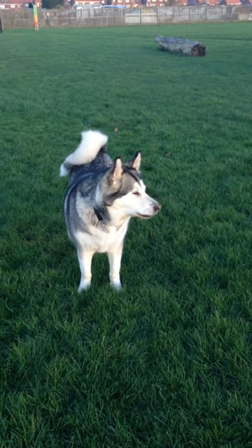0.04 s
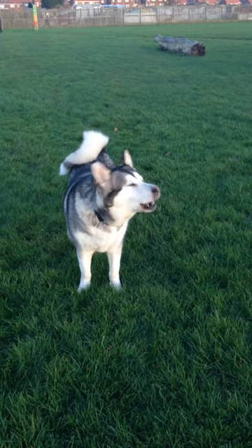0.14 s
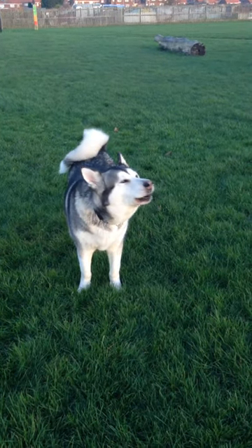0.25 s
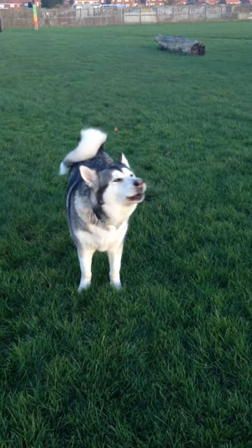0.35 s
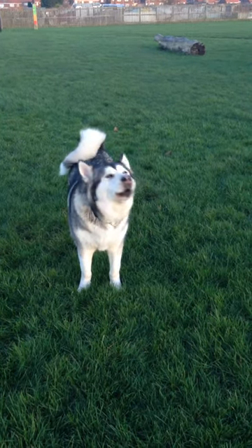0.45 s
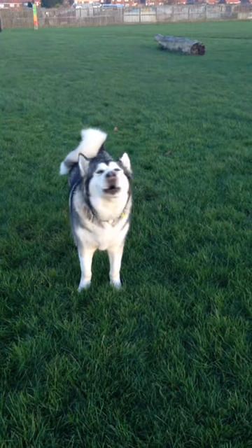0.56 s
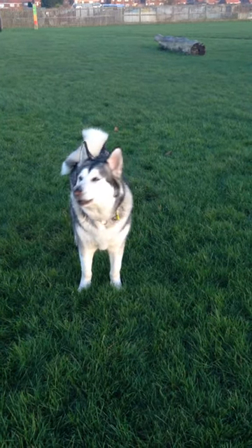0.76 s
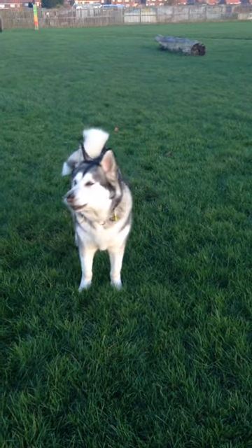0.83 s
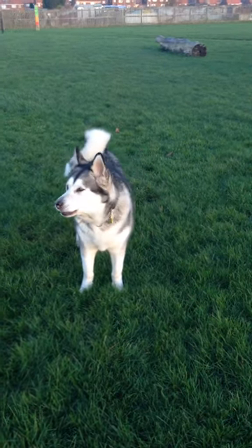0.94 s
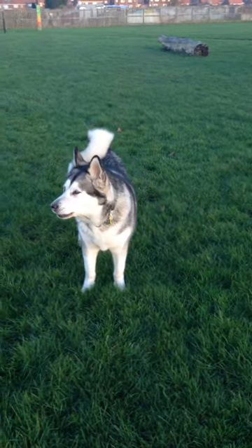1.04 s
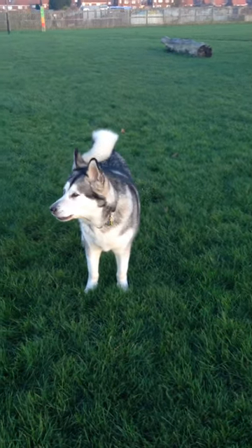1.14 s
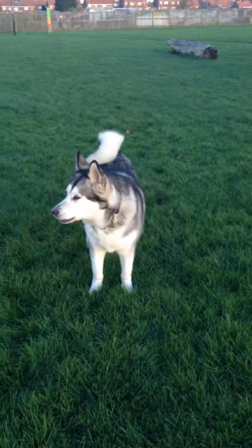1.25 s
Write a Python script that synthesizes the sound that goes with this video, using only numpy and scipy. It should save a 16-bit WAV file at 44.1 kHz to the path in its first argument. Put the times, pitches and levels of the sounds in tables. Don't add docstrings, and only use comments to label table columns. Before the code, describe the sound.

A dog howls once, starting with a loud bark-like burst, then a quieter, nearly pure held note that slides down and ends in a faint throaty creak; quiet open field, phone a few metres away.

```python
import sys
import numpy as np
from scipy import signal
from scipy.io import wavfile
from scipy.ndimage import uniform_filter1d, minimum_filter1d

SR = 44100
rng = np.random.default_rng(int(sys.argv[2]) if len(sys.argv) > 2 else 0)


def how_loud(loudness_db):
    steps = np.asarray(loudness_db, float) / 20
    return 10 ** steps


def file_out(sig):
    cols = np.atleast_2d(sig).T
    lim = np.clip(cols, -1, 1)
    pcm = np.round(lim * 32767).astype(np.int16)
    wavfile.write(sys.argv[1], SR, pcm)


N = 57330
TIME_S = np.arange(N) / SR

# f/Hz, level/dB per Hz
TRAFFIC_SPECTRUM = [(200, -5), (330, -18.5), (480, -3.5), (850, -3.5), (1600, -12.5), (2300, -23.5),
                    (3500, -26), (15300, -29)]
# f/Hz, level/dB per Hz
WIND_SPECTRUM = [(28, -26.5), (45, -1), (62, 10.5), (100, 3.5), (170, -7.5), (260, -22)]
TRAFFIC_DB, WIND_DB = -57, -53.5
# t/s, length/s, level over the steady wind/dB
GUSTS = [(.01, 0.014, -14), (0.132, 0.027, 5.5), (0.276, 0.019, 2.5), (0.405, 0.028, -2.5),
         (.51, 0.022, -6.5), (0.557, 0.025, 3), (.79, .03, -6.5), (0.922, 0.02, 4), (0.98, .02, -8.5),
         (1.048, 0.047, 2.5), (1.204, 0.026, -5), (1.268, 0.026, 5)]

# f/Hz, width/Hz, level/dB
PUFF_FORMANTS = [(400, 83, 6.5), (653, 140, 2.5), (900, 750, -14), (1360, 350, -33), (174, 150, -2.5)]
PUFF_S, PUFF_END_S, PUFF_FROM_DB, PUFF_TO_DB = .17, .188, -46, -44

# t/s, pitch f/Hz, fundamental level/dB, octave level/dB
VOICE_BARK = [
    (0.188, 270.2, -44.5, -33.5),
    (0.2, 307.7, -31, -26.5),
    (0.21, 337.5, -17.5, -29),
    (0.225, 378.3, -5.5, -21),
    (0.231, 389.4, -5, -15),
    (0.251, 387.9, -5, -16),
    (0.258, 368.6, -10.5, -23.5),
    (0.262, 356.7, -12, -48.5),
    (0.272, 333.7, -14.5, -23.5),
]
VOICE_SHOULDER = [(.282, 341.7, -15.5, -28.5), (.3, 342.8, -17, -33), (.314, 344.8, -20.5, -40.5),
                  (.322, 374.4, -21, -34), (.329, 403.7, -30, -37)]
VOICE_HELD = [(.342, 397.9, -30, -39), (.39, 395.5, -30, -42.5), (.47, 361, -26, -39.5),
              (.54, 366.4, -27.5, -40), (.6, 357.8, -29, -41.5), (.665, 335.8, -27.5, -43),
              (.7, 331.9, -28, -45.5), (.728, 336.3, -26.5, -39.5), (.76, 333.8, -31, -40)]
VOICE_SLIDE = [(0.775, 313.2, -40.5, -43.5), (0.817, 280.6, -43.5, -33.5), (0.877, 246.5, -50, -38),
               (0.919, 235, -57.5, -41.5), (0.943, 194, -58.5, -40.5), (0.949, 193, -63, -21)]
# t/s, resonance f/Hz, mouth level/dB, overtone level/dB, rasp level/dB
MOUTH_BARK = [(.185, 800, -47, -75, -61), (.2, 900, -36, -49, -55), (.218, 1080, -23, -46, -42.5),
              (.235, 1200, -41, -49, -40), (.25, 1200, -51.5, -59.5, -45.5), (.263, 1080, -34.5, -44, -54),
              (.29, 1000, -53, -43, -54), (.312, 1100, -67.5, -54.5, -64.5), (.33, 1180, -73, -62, -77)]
MOUTH_HELD = [(.4, 1140, -90.5, -82.5, -87), (.5, 1080, -84.5, -81, -76), (.64, 1059, -75.5, -79, -95.5),
              (.72, 994, -73, -74.5, -71), (.77, 951, -76, -83, -85)]
MOUTH_SLIDE = [(.8, 870, -52.5, -88.5, -90), (.825, 836, -50.5, -83, -73), (.84, 825, -55.5, -84, -87),
               (.865, 765, -53, -90, -87), (.95, 674.4, -83, -97, -95)]
MOUTH_WIDTH_HZ, MOUTH_SHUTS_S = 350, .32
# f/Hz, width/Hz, level/dB
THROAT_FORMANTS = [(1400, 350, -2), (1750, 300, 0), (2320, 250, -10), (3050, 300, -22), (4050, 400, -20),
                   (5500, 500, -24), (8100, 600, -25)]
# f/Hz, width/Hz, level/dB
RASP_FORMANTS = [(1200, 1100, 3), (1886, 430, -1), (2950, 700, -15.5), (4940, 450, -7), (5750, 1400, -0.5),
                 (6570, 530, -4), (7600, 1100, -10.5), (10960, 4000, -21)]
# start t/s, length/s, f/Hz, level/dB
RINGS = [(.222, .04, 2330, -47), (.229, .03, 4680, -50), (.22, .032, 6700, -50), (.254, .02, 1820, -40),
         (.256, .016, 2200, -44), (.268, .02, 2350, -54), (.278, .035, 2050, -59), (.262, .022, 1030, -41),
         (.81, .028, 850, -50), (.275, .044, 2730, -47), (.274, .048, 3420, -52), (.268, .04, 6520, -56),
         (.275, .03, 5500, -68), (.355, .03, 5150, -73), (.46, .08, 2900, -69), (.44, .07, 4750, -74),
         (.48, .06, 5100, -72), (.645, .07, 2680, -64), (.72, .04, 2670, -72), (.76, .04, 1600, -61),
         (.81, .04, 1650, -62), (.77, .065, 5250, -70), (.212, .028, 5850, -49), (.184, .03, 4900, -59),
         (.19, .026, 6250, -57), (.198, .022, 1950, -42), (.21, .026, 1500, -37), (.258, .024, 3030, -55),
         (.785, .04, 1200, -59), (.226, .026, 2750, -58), (.228, .024, 1930, -49), (.31, .03, 2200, -64),
         (.315, .03, 2900, -66), (.19, .024, 2330, -56), (.33, .09, 1580, -66), (.33, .04, 1190, -64),
         (.455, .07, 6530, -77), (.38, .07, 4700, -77), (.7, .06, 1660, -67), (.2, .014, 1600, -44),
         (.2, .03, 7800, -64), (.232, .02, 7400, -62), (.226, .03, 5050, -56), (.228, .022, 5480, -56),
         (.305, .02, 4850, -67), (.315, .016, 5700, -69), (.64, .06, 6000, -78)]
RING_WIDTH_HZ, RING_SHAPE = 300, .6
# t/s, depth/0-1, length/s
CATCHES = [(.343, .3, .004), (.358, .25, .004), (.379, .5, .004), (.548, .3, .004)]
OCTAVE_PHASE, OCTAVE_PHASE_HELD = .06, .3
JITTER, SHIMMER_DB, OVERTONE_SHIMMER_DB = .0034, .5, 2
BREAK_S, BREAK_LENGTH_S, BREAK_JITTER = .263, .012, .007
SCRAPE_DB, SCRAPE_HZ, SCRAPE_WIDTH_HZ = -54, 2600, 1300

ECHO_DB, ECHO_T60_S = -30, .2

# multiple of its pitch, level/dB
FLUTTER_PARTIALS = [(1, -32), (2, -39), (3, -48)]
FLUTTER_S, FLUTTER_LENGTH_S, FLUTTER_HZ, FLUTTER_JITTER = .184, .026, 432, .03

# t/s, peak level/dB, ring f/Hz
FLAPS = [(0.96, -38.5, 472), (0.964, -36, 414), (0.977, -35.5, 424), (1.0, -45, 424), (1.003, -41.5, 426),
         (1.016, -38, 433), (1.037, -42.5, 398), (1.045, -53, 447), (1.052, -40, 449), (1.06, -42.5, 411),
         (1.07, -46, 404), (1.078, -41.5, 382), (1.086, -42, 392), (1.094, -50, 375), (1.106, -42.5, 442),
         (1.125, -41, 420), (1.143, -39, 416), (1.166, -41, 423), (1.181, -47, 417), (1.188, -39.5, 415),
         (1.215, -44.5, 445), (1.23, -41, 418), (1.238, -54, 420), (1.252, -41.5, 448), (1.267, -43.5, 430)]
# multiple of the ring pitch, level/dB, t60/s
CREAK_MODES = [
    (.99, 0, .05),
    (1.3, -4.5, .03),
    (.48, -10, .04),
]
FLAP_DB = .3


def evened(x):
    return x / np.sqrt(np.mean(x ** 2) + 1e-20)


def curve(rows):
    rows = np.array(rows)
    return [np.interp(TIME_S, rows[:, 0], column) for column in rows.T[1:]]


def wobble(size):
    return evened(uniform_filter1d(uniform_filter1d(rng.standard_normal(N), size), size))


def resonate(x, hz, width_hz):
    turn = np.exp(2j * np.pi * hz * np.arange(len(x)) / SR)
    r = np.exp(-np.pi * width_hz / SR)
    return 2 * (turn * signal.lfilter([1 - r], [1, -r], x / turn)).real


def formants(air, table):
    out = 0
    for hz, width_hz, db in table:
        band = air
        for _ in range(3):
            band = resonate(band, hz, width_hz)
        out = out + how_loud(db) * evened(band)
    return out


def hump(hz, centre_hz, width_hz):
    return 1 / (1 + (2 * (hz - centre_hz) / width_hz) ** 2) ** 2


def noise(spectrum, patchy_db, swell_db):
    frames = N // 256 + 5
    bin_hz = np.fft.rfftfreq(1024, 1 / SR)
    real, imag, patches = rng.standard_normal((frames, 513, 3)).T
    patches = uniform_filter1d(patches, size=8, axis=0)
    patches = evened(uniform_filter1d(patches, size=8, axis=1))
    swell = evened(uniform_filter1d(rng.standard_normal(frames), size=20))
    hz, db = np.transpose(spectrum)
    colour_db = np.interp(np.log(bin_hz + 1), np.log(hz + 1), db, left=-90, right=-90)
    gain = how_loud(colour_db[:, None] + patchy_db * patches + swell_db * swell)
    sound = signal.istft((real + 1j * imag) * gain, nperseg=1024, noverlap=768)[1]
    return evened(sound[:N])


def traffic():
    return how_loud(TRAFFIC_DB) * noise(TRAFFIC_SPECTRUM, patchy_db=.5, swell_db=.3)


def wind():
    gust_db = sum(db * np.exp(-((TIME_S - s) / length_s) ** 2) for s, length_s, db in GUSTS)
    return how_loud(WIND_DB) * how_loud(gust_db) * noise(WIND_SPECTRUM, patchy_db=.5, swell_db=.34)


def puff():
    progress = (TIME_S - PUFF_S) / (PUFF_END_S - PUFF_S)
    level_db = PUFF_FROM_DB + (PUFF_TO_DB - PUFF_FROM_DB) * np.clip(progress, 0, 1)
    fade = np.clip(1 - (TIME_S - PUFF_END_S) / .008, 0, 1)
    shape = np.clip(progress * 8, 0, 1) * fade * how_loud(level_db)
    air = rng.standard_normal(N) * how_loud(3 * wobble(size=120))
    return shape * formants(air, PUFF_FORMANTS)


def brief_rings(k, hz):
    gain = 0
    for s, length_s, ring_hz, db in RINGS:
        middle = int((s + length_s / 2) * SR)
        if abs(k * hz[middle] - ring_hz) < 600:
            shape = np.sin(np.pi * np.clip((TIME_S - s) / length_s, 0, 1)) ** RING_SHAPE
            gain = gain + how_loud(db) * hump(k * hz, ring_hz, RING_WIDTH_HZ) * shape
    return gain


def howl():
    hz, low_db, octave_db = curve(VOICE_BARK + VOICE_SHOULDER + VOICE_HELD + VOICE_SLIDE)
    mouth_hz, mouth_db, over_db, rasp_db = curve(MOUTH_BARK + MOUTH_HELD + MOUTH_SLIDE)
    hz = uniform_filter1d(hz, size=200)
    broken = np.exp(-((TIME_S - BREAK_S) / BREAK_LENGTH_S) ** 2)
    jitter = (JITTER + BREAK_JITTER * broken) * wobble(size=120)
    turns = np.cumsum(hz * (1 + jitter)) / SR

    catch = 1 - sum(depth * np.exp(-((TIME_S - s) / w) ** 2) for s, depth, w in CATCHES)
    low = catch * how_loud(low_db + SHIMMER_DB * wobble(size=300))
    octave = how_loud(octave_db + SHIMMER_DB * wobble(size=300))
    lag = np.interp(TIME_S, [MOUTH_SHUTS_S, MOUTH_SHUTS_S + .05], [OCTAVE_PHASE, OCTAVE_PHASE_HELD])
    tone = -low * np.cos(2 * np.pi * turns)
    tone -= octave * np.cos(2 * np.pi * (2 * turns + lag))

    for k in range(3, 26):
        throat = sum(how_loud(db) * hump(k * hz, f, w) for f, w, db in THROAT_FORMANTS)
        size = how_loud(mouth_db) * hump(k * hz, mouth_hz, MOUTH_WIDTH_HZ)
        size += how_loud(over_db + OVERTONE_SHIMMER_DB * wobble(size=500)) * throat
        size += brief_rings(k, hz)
        tone += size * np.cos(2 * np.pi * (k * turns + rng.random()))

    air = (.4 + np.exp(-(turns % 1) / .63)) * rng.standard_normal(N)
    rasp = how_loud(rasp_db) * evened(formants(air, RASP_FORMANTS))
    scrape = resonate(resonate(air, SCRAPE_HZ, SCRAPE_WIDTH_HZ), SCRAPE_HZ, SCRAPE_WIDTH_HZ)
    scrape = how_loud(SCRAPE_DB) * np.sqrt(broken) * evened(scrape)
    fade_in = np.clip((TIME_S - VOICE_BARK[0][0] + .008) / .012, 0, 1)
    fade_out = np.clip((VOICE_SLIDE[-1][0] - TIME_S) / .01, 0, 1)
    return fade_in * fade_out * (np.sqrt(2) * tone + rasp + scrape)


def field(x):
    t = np.arange(SR // 2) / SR
    sparse = rng.choice([-1., 1.], len(t)) * (rng.random(len(t)) < .04)
    taps = sparse * how_loud(-60 * t / ECHO_T60_S) * (t > .01)
    return how_loud(ECHO_DB) * signal.fftconvolve(x, taps / np.linalg.norm(taps))[:N]


def flutter():
    turns = np.cumsum(FLUTTER_HZ * (1 + FLUTTER_JITTER * wobble(size=150))) / SR
    shape = np.sin(np.pi * np.clip((TIME_S - FLUTTER_S) / FLUTTER_LENGTH_S, 0, 1))
    partials = sum(how_loud(db) * np.cos(2 * np.pi * k * turns) for k, db in FLUTTER_PARTIALS)
    return np.sqrt(2) * shape * partials


def creak():
    out = np.zeros(N)
    t = np.arange(3000) / SR
    onset = np.minimum(t / .002, 1)
    for peak_s, flap_db, ring_hz in FLAPS:
        start = int((peak_s - .002) * SR)
        ring = sum(how_loud(db - 60 * t / t60) * np.sin(2 * np.pi * k * ring_hz * t)
                   for k, db, t60 in CREAK_MODES)
        flap = how_loud(FLAP_DB + flap_db) * ring * onset
        out[start:][:len(t)] += flap[:N - start]
    return out


def scene():
    air = traffic() + wind()
    dog = puff() + howl() + flutter() + creak()
    return (dog + field(dog) + air)[None]


def low_pass(x):
    return signal.sosfilt(signal.butter(12, 15330, fs=SR, output="sos"), x)


def record(dry):
    low_cut = signal.sosfilt(signal.butter(2, 40, "high", fs=SR, output="sos"), dry)
    treble_cut = signal.firwin(1023, 15400, window=("kaiser", 9), fs=SR)
    edged = signal.oaconvolve(low_cut, treble_cut[None], "same")
    size = int(.008 * SR)
    gain = np.minimum(1, .995 / (abs(edged) + 1e-9))
    gain = minimum_filter1d(gain, size=size)
    gain = uniform_filter1d(uniform_filter1d(gain, size=size // 2), size=size // 2)
    return low_pass(edged * gain)


dry = scene()
out = record(dry)
file_out(out)
```